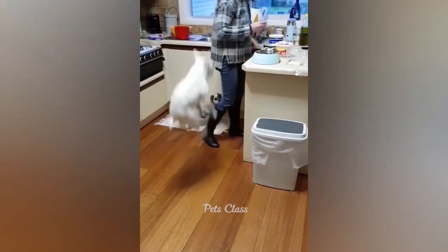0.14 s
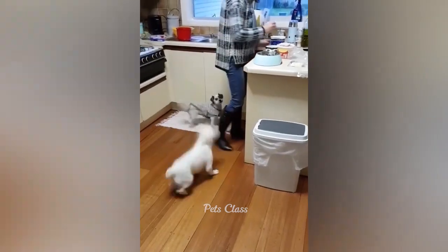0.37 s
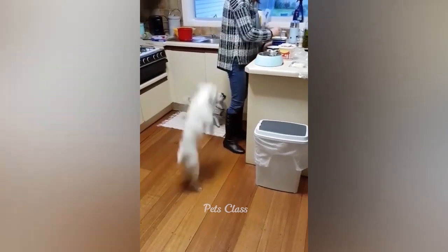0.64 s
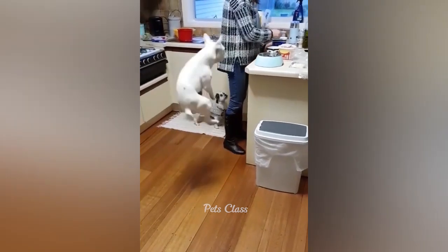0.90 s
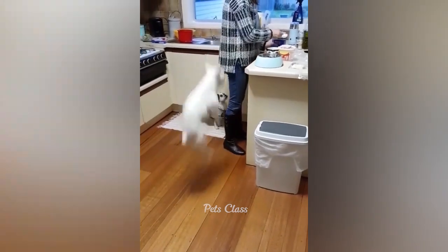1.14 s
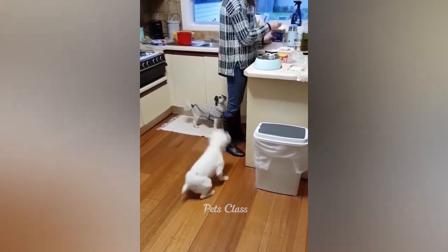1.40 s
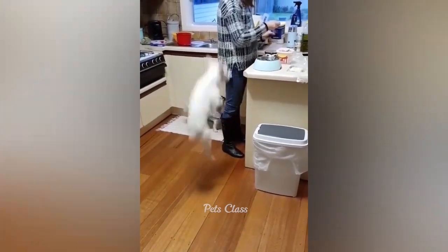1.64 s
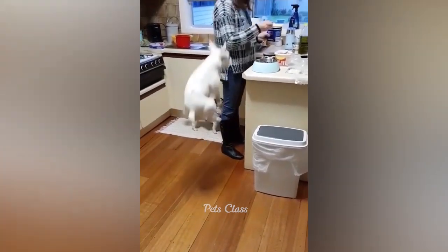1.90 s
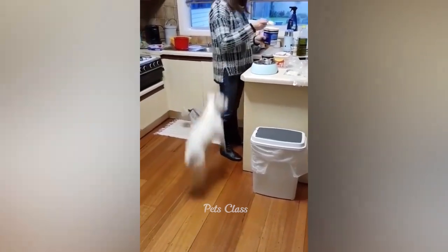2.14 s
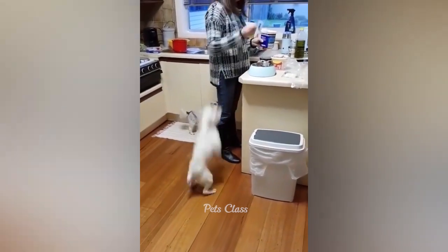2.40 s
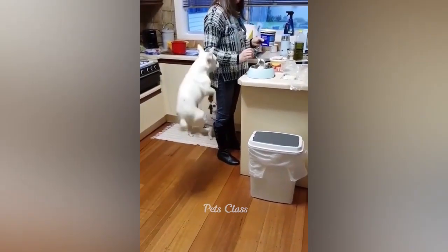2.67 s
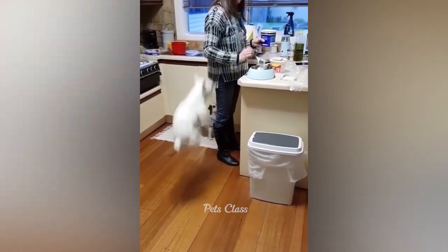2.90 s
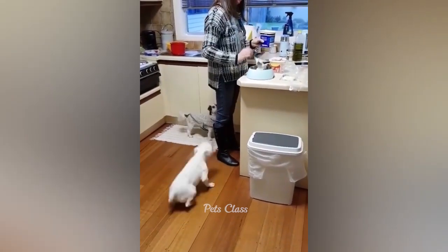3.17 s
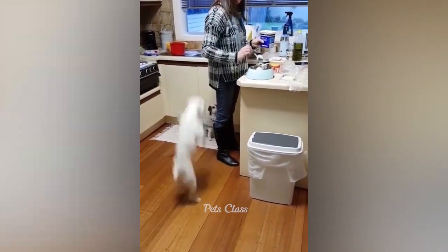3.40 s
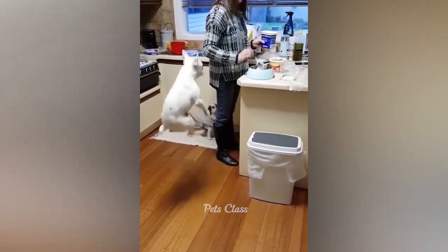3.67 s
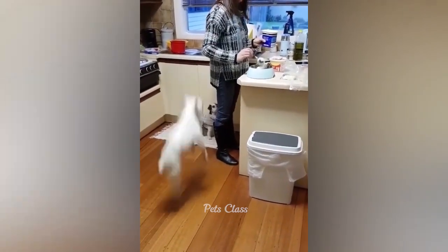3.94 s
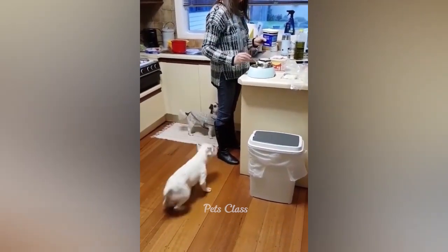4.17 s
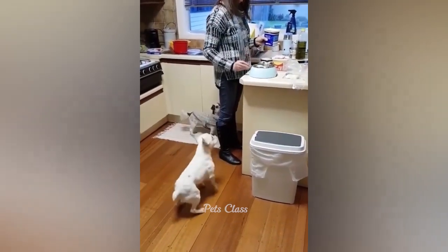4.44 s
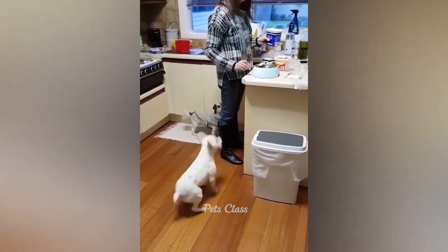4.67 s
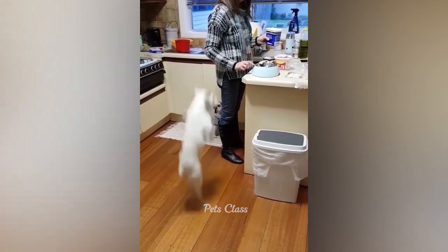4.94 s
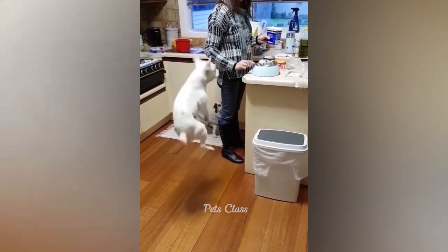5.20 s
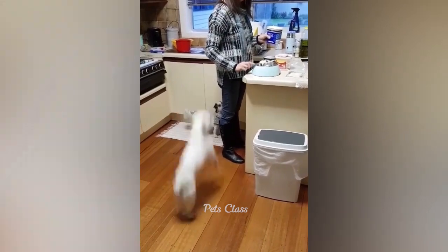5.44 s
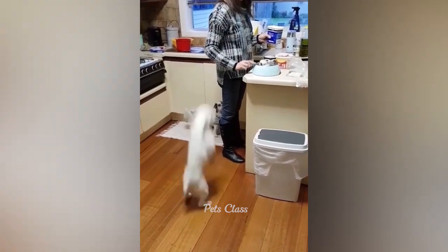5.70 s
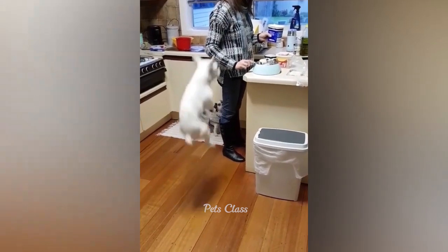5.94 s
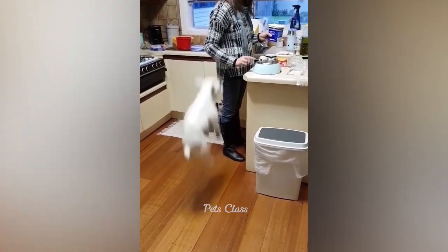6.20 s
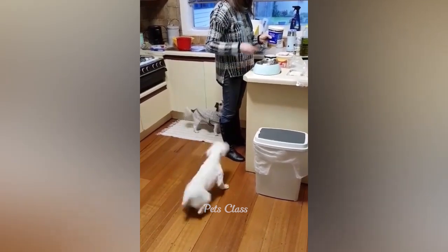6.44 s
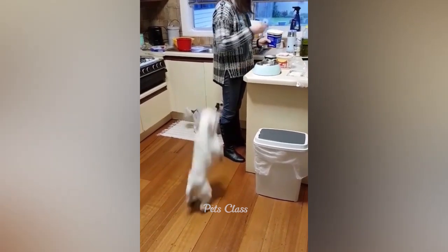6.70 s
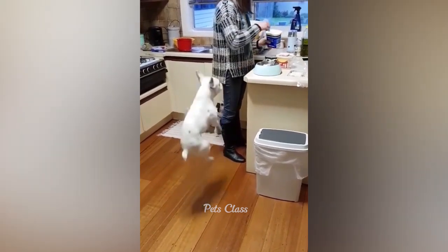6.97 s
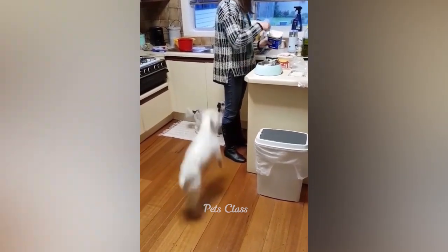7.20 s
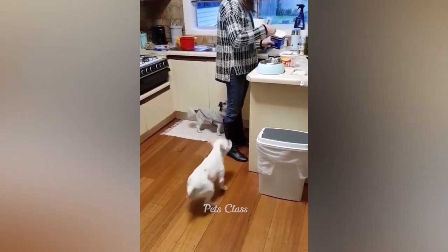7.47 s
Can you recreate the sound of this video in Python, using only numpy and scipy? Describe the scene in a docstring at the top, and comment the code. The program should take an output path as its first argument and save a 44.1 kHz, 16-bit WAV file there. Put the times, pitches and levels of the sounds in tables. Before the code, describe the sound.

A small dog bounces on a wooden kitchen floor, paws thumping and claws clacking, then a spoon raps loudly on a bowl rim.

```python
"""A small dog jumps up and down on a sprung wooden floor in a live kitchen.
From the start there is a faint hiss and a low rumble of filtered noise. Paws thump (ringing boards and a
dull knock), claws clack (short bursts of ticks), and soon feet scuff at take-off (strokes of rough noise).
From 3.8 s, at first faintly, a spoon knocks the rim of a bowl on the counter: a crack and a hollow ring.
At 3.9 s one tiny dry tick is added. The phone microphone clips softly on the loudest blows."""
import sys
import numpy as np
from scipy import signal
from scipy.fft import rfft, irfft, next_fast_len
from scipy.io import wavfile
from scipy.ndimage import uniform_filter1d

SR = 44100
rng = np.random.default_rng(int(sys.argv[2]) if len(sys.argv) > 2 else 0)


def attenuation_scalar(level_db):
    """Turn a level in dB into a linear amplitude multiplier (20 dB per decade)."""
    decades = np.asarray(level_db, float) / 20
    return 10 ** decades


def to_wav(sig):
    """Store sig (one row per channel, or 1-D mono) as 16-bit WAV at the path in sys.argv[1].

    Samples outside -1..1 are clipped; the rate is SR.
    """
    pcm = np.clip(np.atleast_2d(sig), -1, 1) * 32767
    pcm = np.round(pcm).astype(np.int16)
    wavfile.write(sys.argv[1], SR, pcm.T)  # frames by channels


N = 334719  # length in samples

# the weight of a paw meeting the boards; levels are those in the dry mix:
# t/s, level of the loudest 10 ms/dB, f that this spot favours/Hz, knock of the pad relative to the boom/dB
PAW_LANDINGS = [(0.0, -14, 186, -3.5), (0.451, -7, 206, -7.5), (0.495, -7, 173, -6), (0.6, -22.5, 330, -28),
                (0.792, -31, 135.5, -9.5), (1.384, -10.5, 137, -4), (1.444, -9, 199, -10.5),
                (1.599, -21.5, 202, -11.5), (2.321, -5, 133, -23), (2.371, -6, 266, -8.5),
                (2.783, -40, 299, 5.5), (3.204, -7.5, 133, -12.5), (3.244, -7, 262, -8),
                (3.552, -34, 277, -11.5), (4.132, -11, 274, -9.5), (4.168, -10, 164, -7),
                (4.203, -12, 248, -9.5), (4.499, -27, 171.7, -14.5), (4.88, -18, 148, -14),
                (4.91, -33.5, 164, -5), (4.95, -22, 400, -1.5), (5.589, -10.5, 318, -7),
                (5.66, -8.5, 230, -7), (5.779, -12, 138, -11.5), (6.474, -16.5, 122, 1.5),
                (6.518, -11, 242, -4.5), (6.571, -15.5, 133, -14), (6.728, -46, 251, -16),
                (6.914, -32, 202, -18.5), (7.381, -15.5, 276, -7.5), (7.443, -10, 227, -6),
                (7.528, -27, 253, -13)]


def read(points, hz):
    """Reads a spectrum table at the frequencies hz, on a logarithmic frequency scale."""
    f, value = np.transpose(points)
    return np.interp(np.log(hz + 1), np.log(f + 1), value)


def colour(x, gain_at):
    """Filters x by a gain that is a function of frequency, without shifting its phase."""
    size = next_fast_len(len(x))
    gain = gain_at(np.fft.rfftfreq(size, 1 / SR))
    return irfft(rfft(x, size) * gain, size)[:len(x)]


def hump(hz, centre_hz, width_hz):
    """The gain of one resonance: 1 at its centre, 3 dB less at the edges of its width."""
    return 1 / np.sqrt(1 + (2 * (hz - centre_hz) / width_hz) ** 2)


def add(mix, s, sound, db):
    """Places a sound so that its loudest 10 ms have the level db; it may have begun before time zero."""
    loudest = np.sqrt(uniform_filter1d(sound ** 2, SR // 100).max())
    start = round(s * SR)
    sound = sound[max(-start, 0):]
    part = mix[max(start, 0):][:len(sound)]
    part += attenuation_scalar(db) / loudest * sound[:len(part)]


def kitchen():
    """Returns a function that plays a sound in the room: dying noise in bands stands for the echoes."""
    # how long the echoes last: f/Hz, time to fall by 60 dB/s
    echo_times = [(100, 0.54), (300, 0.58), (800, 0.56), (2000, 0.6), (4500, 0.56), (9000, 0.42),
                  (14000, 0.4)]
    t = np.arange(SR * 3 // 4) / SR
    centres = np.log([f for f, _ in echo_times])
    pool = rng.standard_normal(3 * SR)
    bands = [colour(pool, lambda hz: np.interp(np.log(hz + 1), centres, share))
             for share in np.eye(len(echo_times))]
    thicken = 1 - np.exp(-t / 0.0015)  # the echoes build up in the first ms
    fades = [attenuation_scalar(-60 * t / t60) * thicken for _, t60 in echo_times]

    def play(x, direct_db, place=None):
        """Adds the echoes of one place (random if not given); direct_db is direct sound over echoes."""
        start = rng.integers(0, 2 * SR) if place is None else place
        echoes = sum(band[start:start + len(t)] * fade for band, fade in zip(bands, fades))
        echoes = echoes / np.linalg.norm(echoes)
        echoes[0] = attenuation_scalar(direct_db)
        return signal.fftconvolve(x, echoes)
    return play


def crack(body, ring_hz, top_db, clatter_ms, strength, tilt_db=0):
    """A few ticks within some ms, coloured by the struck body and one broad ring."""
    # shape of the top octave, raised or lowered by top_db: f/Hz, gain/dB
    top_shape = [(7500, -10.5), (8500, 5), (16000, 8)]
    t = np.arange(2048) / SR
    fade = np.exp(-t * 1000 / clatter_ms)
    uneven = attenuation_scalar(2.96 * rng.standard_normal(2048))
    spectrum = rfft(rng.standard_normal(2048) * uneven * fade)
    ticks = irfft(spectrum / abs(spectrum))  # hard ticks excite every frequency alike
    ticks *= np.sqrt(fade) * (1 - np.exp(-t / 0.00093))

    def gain(hz):
        tilt = attenuation_scalar(tilt_db * np.log2(1 + hz / 2500))  # tilt_db per octave, well above 2500 Hz
        dull = tilt / np.sqrt(1 + (hz / 7800) ** 24)
        ringing = 1 + strength * hump(hz, ring_hz, 400) ** 2
        return attenuation_scalar(read(body, hz)) * ringing * dull + attenuation_scalar(top_db + read(top_shape, hz))

    return colour(np.append(np.zeros(64), ticks), gain)  # 64 samples of silence lead in


def ring(modes, favoured_hz, width_hz, swell_s, spread_db):
    """A soft push sets the modes going; where it lands decides how strongly each one sounds."""
    t = np.arange(SR // 2) / SR
    hz, db, t60 = np.transpose(modes)[:, :, None]
    luck = rng.standard_normal((len(modes), 2))
    detuned_hz = hz * (1 + 0.0047 * spread_db * luck[:, :1])
    tones = hump(hz, favoured_hz, width_hz) * np.sin(2 * np.pi * detuned_hz * t)
    fades = attenuation_scalar(db + spread_db * luck[:, 1:] - 60 * t / t60)
    return (fades * tones).sum(0) * (1 - np.exp(-t / swell_s)) ** 2


def hiss():
    """The steady air of the room and the microphone: coloured noise."""
    # colour of the hiss, only its shape counts: f/Hz, density/dB per Hz
    air_spectrum = [(53, -17.5), (90, -1.5), (119, -12.5), (145, -6), (169, -12), (266, -13.5), (532, -30),
                    (3660, -41.5), (4500, -27.5), (4860, -21.5), (5200, -32.5), (6030, -35), (8350, -37),
                    (11100, -38.5), (13500, -25), (16000, -29)]
    air = colour(rng.standard_normal(N), lambda hz: attenuation_scalar(read(air_spectrum, hz)))
    return attenuation_scalar(-47) * air / air.std()


def rumble():
    """A low wavering rumble near 55 Hz: the house frame, shaken by each thump and by shifting weight."""
    # weight shifting softly on the floor, a low swell: middle t/s, length/s, rough level at its peak/dB
    sways = [(0.18, 0.2, -33), (0.355, 0.14, -39), (1.063, 0.13, -30.5), (1.32, 0.3, -35.5),
             (1.602, 0.46, -32), (2.2, 0.16, -52), (3.1, 0.17, -38), (3.498, 0.14, -37), (3.98, 0.17, -40),
             (4.5, 0.091, -38), (7.15, 0.35, -44.5)]
    rest_db, shake_db = -50, -22.5  # rough level at rest; shake relative to its thump
    rise_s, t60_s = 0.03, 1  # how a shake builds up and dies
    t = np.arange(N) / SR
    power = attenuation_scalar(2 * rest_db) * np.ones(N)
    for s, db, *_ in PAW_LANDINGS:
        since = np.maximum(t - s, 0)
        shake = attenuation_scalar(db + shake_db - 60 * since / t60_s) * (1 - np.exp(-since / rise_s))
        power = power + shake ** 2
    for s, length, db in sways:
        swell = np.cos(np.pi * np.clip((t - s) / length, -.5, .5)) ** 2
        power = power + (attenuation_scalar(db) * swell) ** 2
    low = colour(rng.standard_normal(N), lambda hz: hump(hz, 54, 19) ** 2 * hz / (hz + 20))
    # even out most of the noise's own ups and downs
    low = low / np.sqrt(uniform_filter1d(low ** 2, SR // 50) + 0.059 * low.var())
    return low * np.sqrt(power)


def paws(room):
    """The boards boom under each paw, and the pad knocks dully above the boom."""
    # ringing of the boards: f/Hz, level before the spot favours some/dB, time to fall by 60 dB/s
    boards = [(77.8, -11, 0.25), (136.2, -1.5, 0.13), (179.1, -1.5, 0.12), (206.7, -2, 0.16),
              (235.6, -0.5, 0.12), (279.6, 1, 0.097), (329.3, -2.5, 0.13), (370.8, -8, 0.12),
              (440, -10, 0.15)]
    # dull colour of the pad: f/Hz, gain/dB
    pad_colour = [(40, -22), (150, -17), (350, -1.5), (600, -2), (850, 1.5), (1100, -2), (1600, -10.5),
                  (3000, -28), (6000, -46.5)]
    out = np.zeros(N)
    for s, db, spot_hz, knock_db in PAW_LANDINGS:
        boom = ring(boards, spot_hz, 120, swell_s=0.0051, spread_db=2.5)
        add(out, s, room(boom, direct_db=3.5), db)
        pad = crack(pad_colour, 2 * spot_hz, top_db=-94.0, clatter_ms=9.9, strength=0.069)
        add(out, s, room(pad, direct_db=-6), db + knock_db)
    return out


def claws(room):
    """Claws clack in short clatters that the room draws out; duller ones lose their top octave too."""
    # clacks, and at 7.369 s a faint smear heard just ahead of a clack; levels are those in the dry mix:
    # t/s, level of the loudest 10 ms/dB, ring f/Hz, tilt/dB per octave, direct sound over echoes/dB
    clacks = [(0.0004, -15, 2500, -14, -6), (0.4453, -13, 2850, -1, -12), (0.5717, -18, 1840, -2, -9),
              (1.3779, -13, 5000, -0.5, -7.5), (1.3865, -13, 2840, -4, 1.5), (1.511, -18.5, 2307, -4, -7.5),
              (1.5191, -16, 2730, -9.5, 0), (2.3128, -10.5, 4430, 1.5, -9), (2.3234, -11, 3010, -8.5, -6.5),
              (3.1909, -11.5, 2180, -2.2, -8.5), (3.2014, -13.5, 2800, -14.5, -2.2),
              (3.2425, -20.5, 2600, 5, -6.5), (4.126, -11, 1920, -4, -5.5), (4.1354, -13, 1950, 4, -1.5),
              (4.837, -22, 1900, -2, -3.5), (4.8822, -24, 1620, 1.5, -16), (4.9285, -22, 4330, 12, -4.5),
              (5.5995, -14.5, 2405, -2, -11), (6.4678, -10.5, 2670, -2, -5), (6.479, -13, 3500, -3, 4),
              (6.53, -22, 1297, -12, -9.5), (7.369, -27.5, 7060, 7, -17), (7.3731, -18, 2510, 2, -13),
              (7.3823, -13.5, 3430, -7.5, -3.5), (7.441, -27, 1000, -6, -5)]
    # colour of a claw on wood: f/Hz, gain/dB
    claw_colour = [(50, -15), (200, 3), (500, -3), (1000, 1), (2500, 6.5), (5000, 4), (7500, -0.5)]
    out = np.zeros(N)
    for s, db, hz, tilt_db, direct_db in clacks:
        top_db = -10.5 + 1.63 * tilt_db  # a level clack's top octave, and its gain per dB of tilt
        clack = crack(claw_colour, hz, top_db, clatter_ms=4.5, strength=0.57, tilt_db=tilt_db)
        add(out, s - 64 / SR, room(clack, direct_db), db)  # makes up for the lead-in silence
    return out


def scuffs(room):
    """Paws and cloth sliding: dense tiny slips under a swelling stroke."""
    # strokes; levels are those in the dry mix:
    # start t/s, length/s, level of the loudest 10 ms/dB, centre f/Hz
    strokes = [(0.284, 0.28, -50, 5220), (0.57, 0.094, -36.5, 5000), (0.774, 0.057, -44.5, 2500),
               (1.029, 0.8, -50.5, 3500), (1.546, 0.058, -27.5, 6300), (2.439, 0.056, -25, 4540),
               (2.764, 0.055, -31.5, 2870), (3.726, 0.21, -58, 497), (3.349, 0.065, -24, 6500),
               (3.952, 0.44, -38, 4570), (4.427, 0.121, -53.5, 4900), (4.535, 0.025, -23, 3950),
               (4.892, 0.12, -23, 6040), (7.436, 0.06, -38, 1390), (6.603, 0.12, -24, 6400)]
    out = np.zeros(N)
    for s, length, db, hz in strokes:
        size = round(length * SR)
        roughness = attenuation_scalar(3.6 * rng.exponential(1, size))  # a few slips stand out
        slips = rng.standard_normal(size) * roughness * np.hanning(size)
        stroke = colour(slips, lambda f: hump(f, hz, 2.0 * hz) * f / (f + 900))
        add(out, s, room(stroke, direct_db=-13), db)
    return out


def spoon(room):
    """The spoon cracks on the rim, which rings briefly; bowl and counter answer with a hollow note."""
    # blows; both levels are those of the loudest 10 ms in the dry mix:
    # t/s, level of the crack/dB, level of the hollow ring/dB, ring f of the spoon/Hz, ring strength (ratio)
    knocks = [(3.775, -67, -39.5, 4970, 1.7), (4.5513, -14.5, -30, 2680, 2.1), (5.25, -4, -2.5, 5310, 1.7),
              (5.4206, -2.5, -4, 4120, 0.65), (5.5676, -4, -6, 4570, 0.3), (5.722, -2.5, -6, 4930, 0.83),
              (5.8721, -4.5, -6, 4570, 0.86), (6.016, -4.5, -7.5, 4570, 0.31),
              (6.1911, -2.5, -4.5, 2230, 0.19)]
    # colour of the spoon: f/Hz, gain/dB
    spoon_colour = [(50, -24), (200, -0.5), (450, 3), (650, -3), (1000, -1.5), (2500, -4.5), (5000, -5.5),
                    (7500, -8.5)]
    # resonances of the rim: f/Hz, width/Hz, gain before the common factor/dB
    rim_modes = [(915, 60, -8.5), (1139, 11, -9.5), (1614, 50, 3), (1920, 120, 2.5), (2380, 28, -1.5),
                 (2473, 200, 6), (4570, 490, -6.5), (4700, 350, -7)]
    # bowl, counter and the corner of the room around them:
    # f/Hz, level before the favoured region is applied/dB, time to fall by 60 dB/s
    bowl_modes = [(147.7, -19, 0.19), (265.4, -13, 0.24), (290.4, -10, 0.28), (335.6, -17.5, 0.25),
                  (370.8, -16.5, 0.23), (390.4, -9.5, 0.22), (406.4, -12, 0.28), (434, -0.5, 0.27),
                  (452.7, -7.5, 0.31), (478, -10.5, 0.23), (514, -12, 0.24), (569, -17.5, 0.18),
                  (591.4, -18.5, 0.24), (674, -16.5, 0.25)]

    def rim_gain(f):
        return 1 + 0.61 * sum(attenuation_scalar(d) * hump(f, c, w) ** 2 for c, w, d in rim_modes)

    out = np.zeros(N)
    place = rng.integers(0, 2 * SR)  # the bowl stays in its place: every knock has the same echoes
    for s, db, hollow_db, hz, strength in knocks:
        blow = crack(spoon_colour, hz, top_db=-12, clatter_ms=9.5, strength=strength)
        blow = np.append(blow, np.zeros(2048))
        rim = colour(np.roll(blow, 1024), rim_gain)[1024:]  # rolled to leave room on both sides
        add(out, s - 64 / SR, room(rim, -6.0, place), db)
        hollow = ring(bowl_modes, 433, 900, swell_s=.012, spread_db=0.3)
        add(out, s, room(hollow, 16, place), hollow_db)
    return out


def tick():
    """A few cycles of two quickly dying tones with no echo, close to the microphone."""
    # the one tick: t/s, level of the loudest 10 ms in the dry mix/dB, f of the upper tone/Hz
    dry_tick = (3.875, -45, 1400)
    s, db, hz = dry_tick
    out, t = np.zeros(N), np.arange(400) / SR
    tones = np.sin(2 * np.pi * hz * t) + 1.3 * np.sin(2 * np.pi * 600 * t)
    add(out, s, np.exp(-t / 0.001) * tones, db)
    return out


def scene():
    """All sources at one microphone."""
    room = kitchen()
    mix = hiss() + rumble() + paws(room) + claws(room) + scuffs(room) + spoon(room) + tick()
    return mix[None]  # one channel


def top_cut(x):
    """Nothing passes above the cut-off."""
    return signal.sosfilt(signal.butter(12, 16480, fs=SR, output="sos"), x)


def record(dry):
    """The whole mix gets one overall colour, then its peaks bend smoothly towards full scale."""
    # overall colour, a step down near 8.4 kHz, another near 13 kHz, little above 16 kHz: f/Hz, gain/dB
    overall_colour = [(8200, -3), (8600, -9.5), (12700, -8), (13100, -13), (15800, -22), (16300, -49.5)]
    heard = colour(dry[0], lambda hz: attenuation_scalar(read(overall_colour, hz)))[None]
    clipped = heard / (1 + abs(heard) ** 6) ** (1 / 6)
    return top_cut(clipped)


dry = scene()
out = record(dry)
to_wav(out)
```